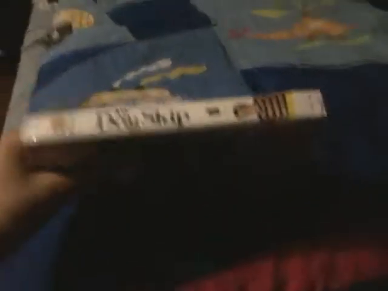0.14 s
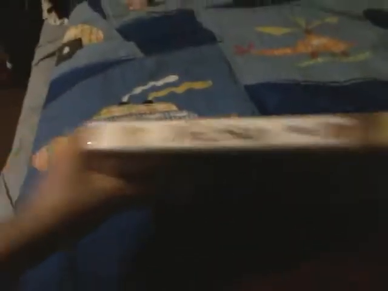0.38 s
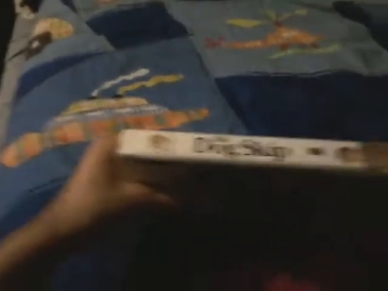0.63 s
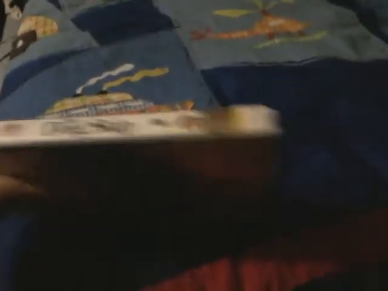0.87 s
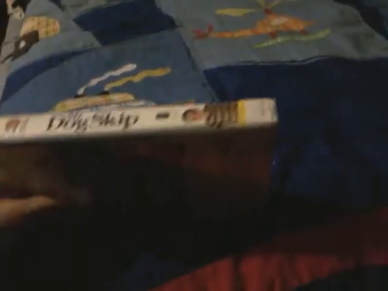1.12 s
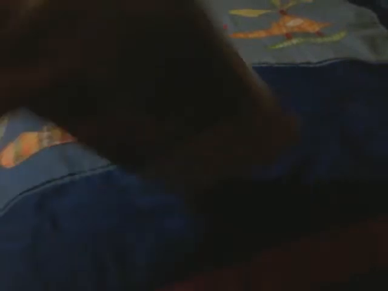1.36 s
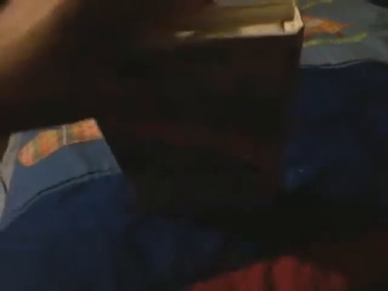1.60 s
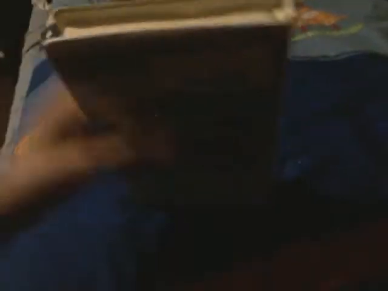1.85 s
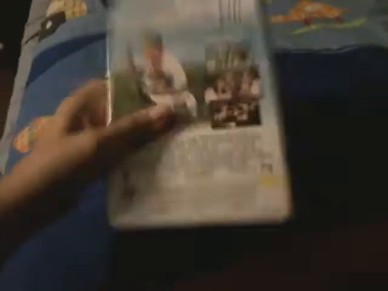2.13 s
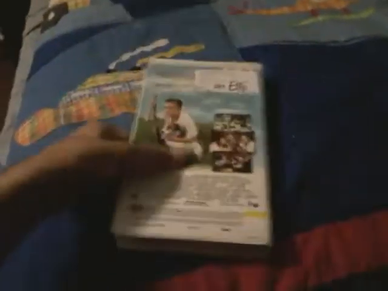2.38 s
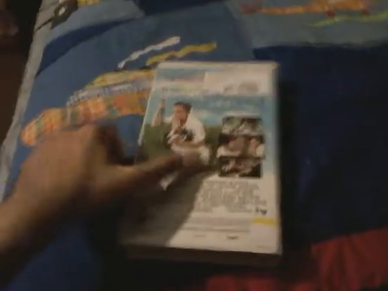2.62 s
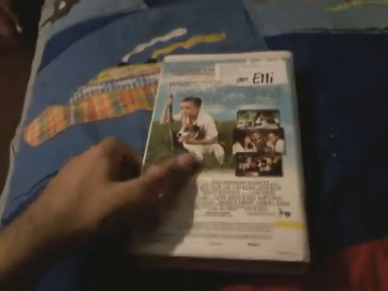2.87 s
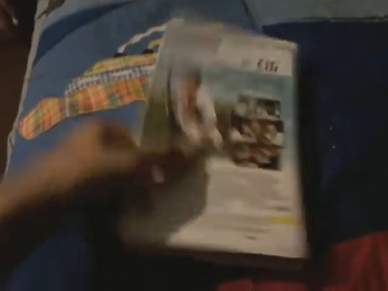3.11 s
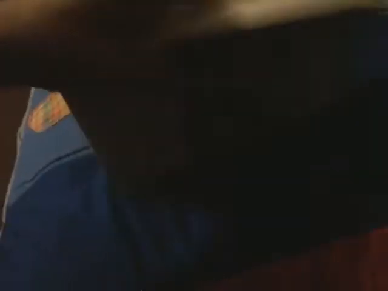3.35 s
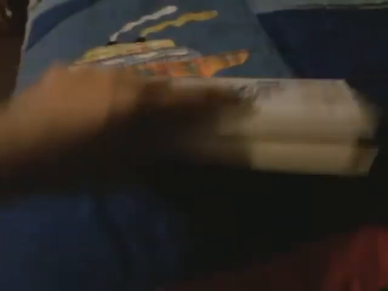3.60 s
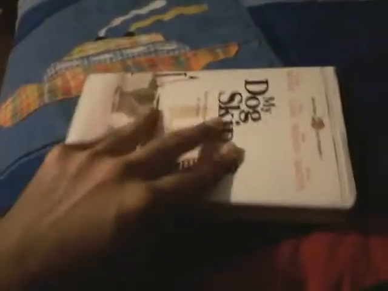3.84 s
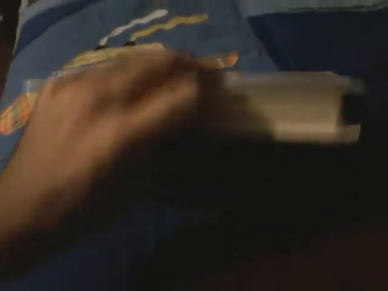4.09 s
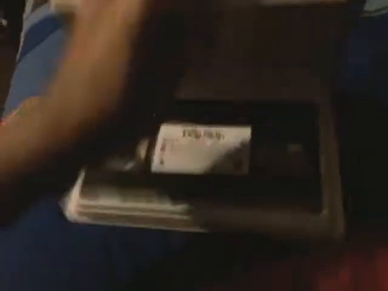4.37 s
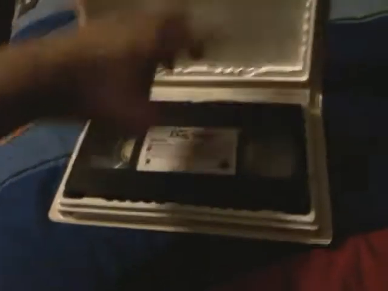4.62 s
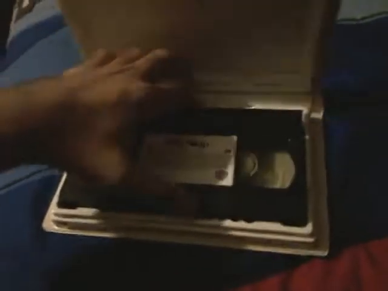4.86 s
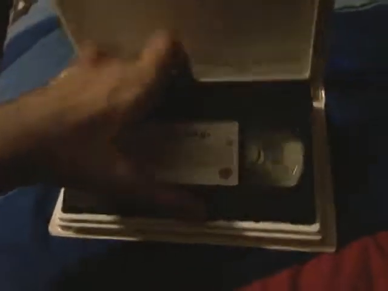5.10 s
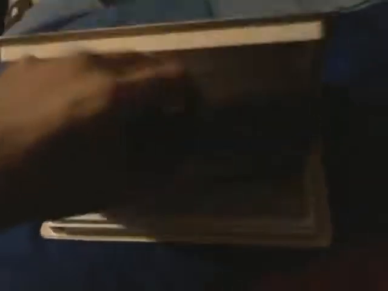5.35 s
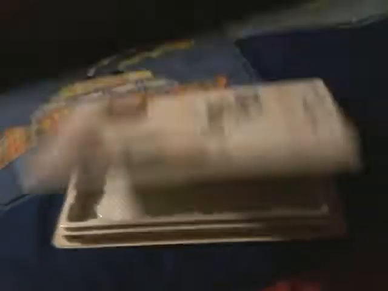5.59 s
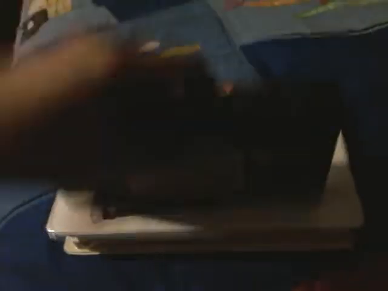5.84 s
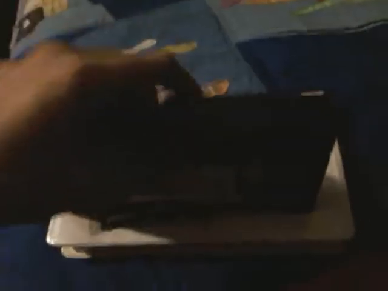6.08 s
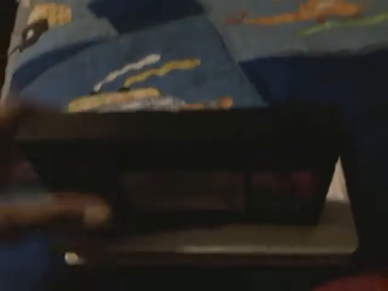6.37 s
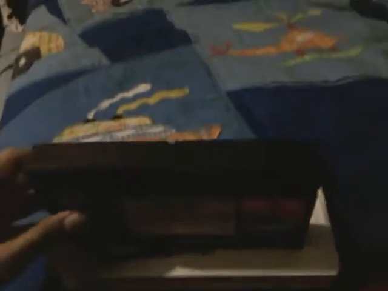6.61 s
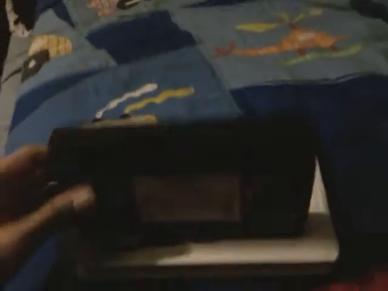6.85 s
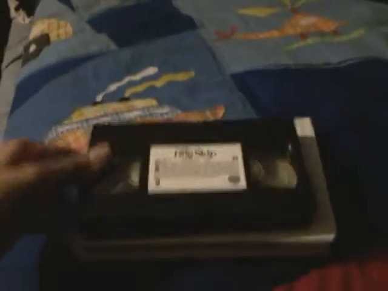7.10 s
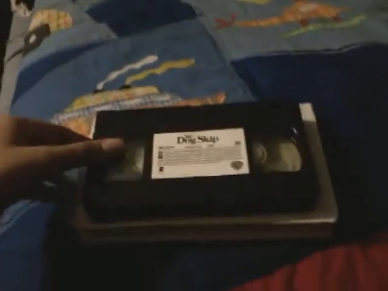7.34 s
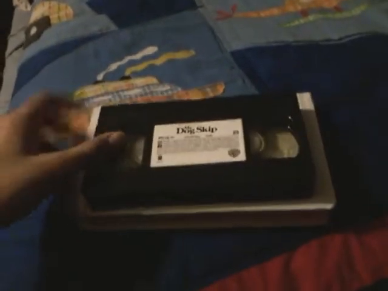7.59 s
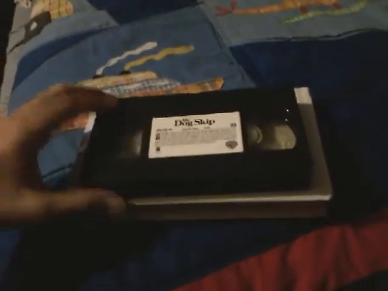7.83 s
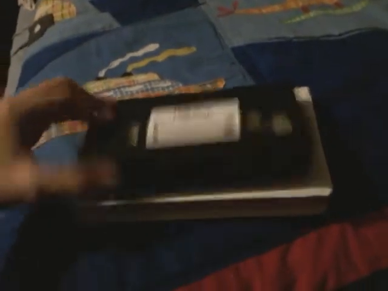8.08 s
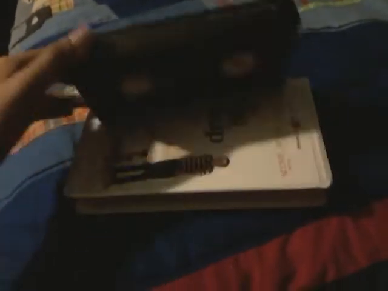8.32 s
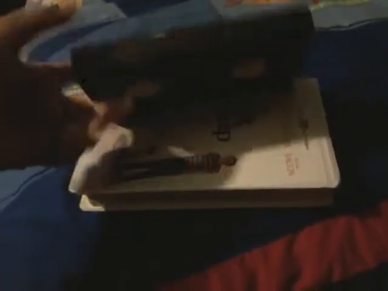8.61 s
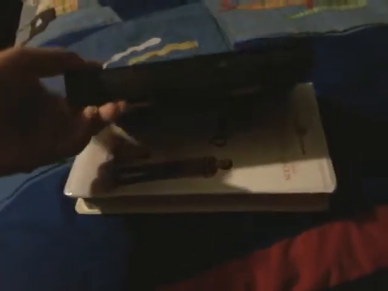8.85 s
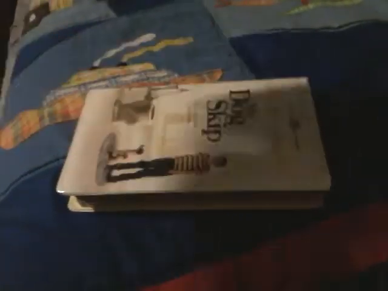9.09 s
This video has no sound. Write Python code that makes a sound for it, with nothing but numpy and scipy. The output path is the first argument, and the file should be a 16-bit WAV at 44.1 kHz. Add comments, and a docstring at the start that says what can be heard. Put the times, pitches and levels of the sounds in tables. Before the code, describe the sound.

Close plastic handling in a quiet soft room: light rubbing, a sharp catch pop, rattling clicks, loud hollow clacks, then sparse cassette taps.

```python
"""A faint mains hum and soft hiss come first, then quiet rubbing and light knocks join in.
A hollow plastic clamshell case and the cassette inside it are turned, opened, snapped shut and set down on a bed.
Each contact is a spiky noise rattle sent through a brittle edge, a ringing hollow shell and flat panels.
Fingers and cloth are grainy noise with squeaks and crackles; thumps through the bedding are short low swings.
A small soft room answers, and the microphone favours tones near 7 kHz."""
import sys
import numpy as np
from scipy import signal
from scipy.fft import rfft, irfft
from scipy.io import wavfile
from scipy.ndimage import uniform_filter1d, map_coordinates

SR = 44100
rng = np.random.default_rng(int(sys.argv[2]) if len(sys.argv) > 2 else 0)


def bounce(signal):
    """Save signal as a 16-bit WAV file at the path given by the first command-line argument."""
    frames = np.transpose(np.atleast_2d(signal))
    limited = np.clip(frames, -1, 1)
    pcm = np.round(limited * 32767).astype(np.int16)
    wavfile.write(sys.argv[1], SR, pcm)


def convert_level_to_amplitude(level_db):
    """Map a level in decibels to its linear amplitude factor."""
    exponent = np.asarray(level_db, float) / 20
    return 10 ** exponent


N = 406161  # length of the scene in samples
TAIL = 8192  # room for one event in samples


def unit(x):
    """Scales the whole signal to rms 1."""
    return x / np.sqrt(np.mean(x ** 2) + 1e-20)


def peaked(x):
    """Scales every row to peak 1."""
    return x / np.abs(x).max(-1, keepdims=True)


def along(points, hz):
    """Reads a curve of (Hz, value) points on a logarithmic pitch axis."""
    point_hz, value = np.transpose(points)
    return np.interp(np.log(hz + 1), np.log(point_hz + 1), value)


def curves(rows):
    """Draws one value per sample for each column after the time."""
    s, *columns = np.transpose(rows)
    return [np.interp(np.arange(N) / SR, s, column) for column in columns]


def wobble(rate):
    """A smooth random curve with the given number of random points a second."""
    points = rng.standard_normal(int(N * rate / SR) + 4)
    return map_coordinates(points, [np.arange(N) * rate / SR])


def coloured(x, points):
    """Filters x by (Hz, dB) points without sounding ahead of time (minimum phase)."""
    log_gain = np.log(convert_level_to_amplitude(along(points, np.fft.rfftfreq(4096, 1 / SR))))
    cepstrum = irfft(log_gain)
    # folding the second half onto the first puts the energy as early as possible
    cepstrum[1:2048] *= 2
    cepstrum[2049:] = 0
    kernel = irfft(np.exp(rfft(cepstrum)))
    return signal.oaconvolve(np.atleast_2d(x), kernel[None], axes=1)[:, :x.shape[-1]]


def resonance(rows, hz, width):
    """Each row excites its own resonance; width is a share of the pitch."""
    f = np.fft.rfftfreq(rows.shape[1], 1 / SR)
    damping = 1j * f * width * hz
    response = damping / (hz ** 2 - f ** 2 + damping)
    return irfft(rfft(rows) * response, rows.shape[1])


def placed(rows, s):
    """Adds the rows up on the time line, each from its own start in seconds."""
    at = np.round(s * SR).astype(int) + np.arange(TAIL)
    return np.bincount(at.ravel(), rows.ravel(), N + TAIL)[:N]


def grains(shape, depth_db):
    """Stick-slip noise: sudden uneven grains, with coloured patches that drift as the contact moves."""
    size = rng.standard_normal((shape[0], shape[1] // 256 + 1))
    size = np.repeat(size, 256, 1)[:, :shape[1]]
    spectrum = signal.stft(rng.standard_normal(shape), nperseg=256)[2]
    field = uniform_filter1d(rng.standard_normal(spectrum.shape), size=4, axis=1)
    field = uniform_filter1d(field, size=12, axis=2)
    patchy = signal.istft(spectrum * convert_level_to_amplitude(3 * unit(field)), nperseg=256)[1][:, :shape[1]]
    return patchy * convert_level_to_amplitude(depth_db * size)


# How fast the room falls silent. Each row: pitch in Hz, time to fall by 60 dB in seconds.
ROOM_DECAY = [(200, 0.25), (1000, 0.16), (8000, 0.14)]


def room(rows):
    """Reflections: a fresh diffuse noise tail for every row, each frequency dying at its own speed."""
    hz, t, spectrum = signal.stft(rng.standard_normal(rows.shape), SR, nperseg=256)
    fade = convert_level_to_amplitude(-60 * t / along(ROOM_DECAY, hz)[:, None])
    tail = signal.istft(spectrum * fade, SR, nperseg=256)[1]
    # the first walls are a metre or two away, so the tail grows over 14 ms
    tail *= np.clip(np.arange(tail.shape[1]) / SR / 0.014, 0, 1)
    tail /= np.linalg.norm(tail, axis=1, keepdims=True)
    return signal.fftconvolve(rows, tail, axes=1)[:, :rows.shape[1]]


# Colour of the air in the room. Each row: pitch in Hz, relative level in dB.
AIR_COLOUR = [(20, -9.5), (45, -10), (80, -1.5), (130, -6.5), (200, -8.5), (400, -18), (700, -25.5),
              (1500, -30), (3000, -35.5), (8000, -37.5), (16000, -36.5)]


def room_air():
    """Steady hiss and low rumble: random noise with the colour of the room's air."""
    return convert_level_to_amplitude(-60.0) * unit(coloured(rng.standard_normal(N), AIR_COLOUR))


# Mains hum. Each row: pitch in Hz, average rms level in dB before it wavers.
HUM_TONES = [(120, -60), (180, -76), (240, -82.5), (300, -81), (360, -71.5)]


def hum():
    """Mains harmonics: steady sine waves, each wavering a little in level and phase."""
    t = np.arange(N) / SR
    total = 0
    for hz, db in HUM_TONES:
        level = np.sqrt(2) * convert_level_to_amplitude(db + 0.91 * wobble(20))
        total = total + level * np.sin(2 * np.pi * hz * t + 0.58 * wobble(10))
    return total


# Thumps reaching the microphone through the bedding.
# Each row: start in seconds, peak level in dB, pitch in Hz.
BED_THUMPS = [(2.318, -35, 192), (3.429, -47, 75), (3.735, -44.5, 40), (3.87, -48.5, 75), (4.28, -51, 40),
              (4.412, -31, 82.2), (4.493, -29.5, 154), (5.17, -54, 60), (5.249, -44, 51), (5.332, -42, 110),
              (5.521, -45, 50), (5.888, -35, 128.5)]


def pushes():
    """The mattress heaves for a cycle or two: a heavily damped low swing."""
    s, db, hz = np.transpose(BED_THUMPS)[:, :, None]
    turns = hz * np.arange(TAIL) / SR
    swing = turns * np.exp(-2.2 * turns) * np.sin(2 * np.pi * turns)
    return placed(convert_level_to_amplitude(db) * peaked(swing), s)


# Fine hiss of skin on plastic. Each row: pitch in Hz, relative level in dB per Hz.
FINE_COLOUR = [(2000, -19), (3500, -9), (5000, -9), (7000, -7.5), (9000, -6), (16000, -11.5)]


def fine_hiss(shape, depth_db):
    """Small ridges of skin slip over plastic: bright grainy noise at rms 1."""
    return unit(coloured(grains(shape, depth_db), FINE_COLOUR))


# Coarse scrape of skin and cloth. Each row: pitch in Hz, relative level in dB per Hz.
COARSE_COLOUR = [(200, -22.5), (500, 1), (1000, 1), (2000, -3), (3000, -6.5), (5000, -20)]


def coarse_scrape(shape, depth_db):
    """Broad rubbing makes duller grainy noise, at rms 1."""
    return unit(coloured(grains(shape, depth_db), COARSE_COLOUR))


# Fingers shifting between strokes. Each row: time in seconds, scrape level in dB before the flurries.
FIDGETING = [(0, -72), (.5, -78.5), (1.1, -69.5), (2.1, -74), (2.5, -70), (3.1, -74.5), (4.1, -68.5),
             (4.55, -68), (4.9, -69.5), (5.1, -66.5), (5.62, -56), (5.85, -67.5), (6.2, -71), (6.6, -82),
             (7.2, -68), (7.9, -74), (8.6, -74), (9.21, -77.5)]


def rubbing():
    """Faint fidgeting of the fingers: hiss and scrape noise, coming in flurries."""
    coarse_db, = curves(FIDGETING)
    fine_db = coarse_db - 1.5
    flurry_db = 3.0 * wobble(25)
    hiss = convert_level_to_amplitude(fine_db + flurry_db) * fine_hiss((1, N), depth_db=1.1)
    scrape = convert_level_to_amplitude(coarse_db + flurry_db) * coarse_scrape((1, N), depth_db=0.0)
    return hiss + scrape


# Colour of the brittle plastic edge. Each row: pitch in Hz, relative level in dB per Hz.
EDGE_COLOUR = [(700, -37.5), (1500, -1), (2200, 1.5), (3200, -0.5), (5000, -3), (9000, -4.5), (16000, -12)]


def through_edge(x):
    """A thin brittle edge passes the middle and treble and little bass."""
    return coloured(x, EDGE_COLOUR)


# Sliding strokes of skin and cloth. Each row: start in seconds, length in seconds,
# scrape level in dB, hiss level in dB over the scrape, squeak pitch in Hz.
SLIDES = [(0.153, 0.071, -64.5, -2, 7000), (0.596, .16, -73.5, -18, 7000), (0.738, 0.25, -66.5, 1.5, 1500),
          (0.802, 0.17, -66.5, 6, 1490), (1.151, 0.05, -77.5, 13.5, 7000), (1.308, 0.078, -67.5, 0, 7040),
          (1.497, 0.086, -64, 1, 1020), (1.939, 0.092, -67.5, -4, 7200), (2.31, 0.048, -49.5, 9, 2160),
          (2.363, 0.087, -58, -11, 7360), (2.575, 0.043, -65, -6, 402), (2.875, 0.048, -61.5, -7, 7540),
          (3.15, 0.086, -72.5, 6, 7540), (3.229, 0.088, -58, 6.5, 2500), (3.325, .06, -58, 8.5, 3000),
          (3.359, 0.073, -58, 10, 3700), (3.547, 0.072, -83, 15, 7300), (3.721, 0.068, -53, -4, 6400),
          (4.263, 0.049, -44, -7.5, 2320), (4.383, 0.046, -51, -12.5, 2900), (5.147, .1, -48.5, -11, 2030),
          (5.233, .085, -50.5, 2.5, 2300), (5.318, 0.11, -55, -7, 2380), (5.741, .05, -61, -7, 1700),
          (5.796, 0.034, -61.5, -4.5, 930), (6.888, 0.058, -64.5, 5.5, 4760), (7.036, 0.13, -56, 0.5, 7260),
          (7.265, .08, -66, -3, 7400), (7.332, 0.017, -55, -12, 1920), (7.487, 0.037, -49.5, -3, 2020),
          (8.131, 0.1, -63, 2, 5970), (8.277, 0.097, -68.5, 7, 6240), (8.382, 0.12, -79, -9, 4200),
          (8.689, 0.022, -48.5, -11, 3500)]


def strokes():
    """Sliding friction: grainy noise starts and stops quickly, with a faint squeak and crackles."""
    squeak_db, crackle_db = -7.5, 21  # against the scrape
    crackles_per_s = 170
    grip_share, let_go_s = .3, 0.054  # part of a stroke spent taking hold; time to let go
    start, length, coarse_db, hiss_db, hz = np.transpose(SLIDES)[:, :, None]
    fine_db = coarse_db + hiss_db
    t, shape = np.arange(TAIL) / SR, (len(start), TAIL)
    take_hold = np.clip(t / (grip_share * length), 0, 1)
    let_go = np.clip((length - t) / let_go_s + .5, 0, 1)
    grip = np.sin(np.pi / 2 * take_hold * let_go) ** 2

    slide = convert_level_to_amplitude(fine_db) * fine_hiss(shape, depth_db=0.1)
    slide = slide + convert_level_to_amplitude(coarse_db) * coarse_scrape(shape, depth_db=5.0)
    squeak = resonance(grains(shape, depth_db=3.6), hz, width=0.099)
    squeak = convert_level_to_amplitude(coarse_db + squeak_db) * squeak / squeak.std(1, keepdims=True)

    # a smooth random flutter with 45 points a second in every stroke
    spots = np.broadcast_arrays(np.arange(len(start))[:, None], t * 45)
    flutter = convert_level_to_amplitude(1.8 * map_coordinates(rng.standard_normal((len(start), 32)), spots))

    # the plastic crackles as it flexes
    ticks = (rng.random(shape) < crackles_per_s / SR) * rng.standard_normal(shape)
    ticks = signal.lfilter([1], [1, 0, .6], ticks)
    crackle = convert_level_to_amplitude(coarse_db + crackle_db) * through_edge(ticks)
    dry = grip * (flutter * (slide + squeak) + crackle)
    return placed(dry + convert_level_to_amplitude(-7) * room(dry), start)


# Knocks, where a face of case or cassette lands. Each row: start in seconds, snap peak in dB,
# body level in dB against the snap, body pitch in Hz, rattle time to fall by 60 dB in seconds.
LANDINGS = [(.1773, -47.5, 7, 151, 0.037), (0.266, -50, 6.5, 377, 0.024), (1.542, -38.5, -6, 358, 0.0091),
            (2.1981, -49.5, -4, 151, 0.038), (2.3116, -30, 1, 301, 0.037), (2.3217, -21, 7.5, 384, 0.044),
            (2.8175, -47.5, -5, 196, 0.025), (3.2944, -37, 0, 336, 0.021), (3.3257, -37.5, 3.5, 336, 0.066),
            (3.999, -37.5, 0.5, 640, 0.03), (4.2681, -35, -7, 194, .051), (4.289, -21.5, -7, 487, 0.018),
            (4.7282, -11.5, -19, 680, 0.0063), (4.775, -27.5, -24, 154, 0.012),
            (4.8112, -23.5, -11, 660, 0.037), (4.842, -26, -19, 323, 0.013),
            (4.8624, -33.5, -8.5, 482, .014), (5.0353, -39, 4, 750, 0.036), (5.0938, -49, 0, 600, 0.027),
            (5.1511, -26.5, -12.5, 361, 0.041), (5.1866, -32.5, -8.5, 301, .014),
            (5.204, -41, -10, 600, 0.013), (5.218, -34, -6, 300, .02), (5.2301, -28, -4.5, 150, 0.032),
            (5.2465, -27, -12, 151, 0.021), (5.2726, -27, 1.5, 573, 0.023), (5.291, -38, 1, 400, 0.022),
            (5.3283, -29.5, 0.5, 553, 0.025), (5.3523, -30, 0, 537, 0.039), (5.445, -16, -20, 620, 0.026),
            (5.4674, -20.5, -6, 631, 0.027), (5.4768, -26, -8, 373, .026), (5.518, -7.5, -4.5, 620, 0.04),
            (5.7416, -37.5, -19.5, 151, 0.042), (5.8845, -9, -6.5, 549, 0.027),
            (5.8895, -12, 9.5, 600, .015), (5.9042, -6.5, -0.5, 309, 0.033), (7.1078, -15.5, -12, 310, .03),
            (7.114, -21, -14, 600, .05), (7.3335, -34.5, -16, 210, .022), (7.7701, -49.5, -3, 332, .031),
            (8.241, -37, -4, 660, 0.034), (8.977, -50, 2, 620, 0.03)]


def knocks():
    """A landing face sounds dull; higher knocks move from the shell to the flat panels."""
    panel_db = -13  # panels against the snap when only the shell is struck
    s, db, body_db, knock_hz, t60 = np.transpose(LANDINGS)
    flat = np.clip(np.log2(knock_hz / 480) / 0.72, 0, 1)  # 0 below 480 Hz, 1 from 0.72 octaves above
    shell_db = body_db - 14 * flat
    panel_db = panel_db + flat * (body_db - panel_db)
    colour_hz = 1852 * np.exp(.07 * rng.standard_normal(len(s)))
    return [s, db, shell_db, panel_db, colour_hz, knock_hz, t60]


# Snaps, where a thin edge or catch lets go. Each row: start in seconds, snap peak in dB,
# shell level in dB against the snap, snap colour in Hz, rattle time to fall by 60 dB in seconds.
RELEASES = [(1.4526, -50, -10, 3030, 0.047), (1.9809, -50.5, 0, 7290, 0.059), (2.7315, -39, -7, 7460, 0.04),
            (2.888, -47, -13, 5670, 0.019), (2.9073, -39.5, -1, 7640, 0.024), (3.7271, -43, -10, 6380, .02),
            (3.7407, -40, 2, 5340, 0.096), (3.7656, -28, -7.5, 6960, 0.017),
            (4.145, -25, -8.5, 1520, 0.015), (4.356, -44, -14, 5000, .01), (4.365, -39, -20, 4600, .01),
            (4.393, -41, 0, 6000, 0.052), (4.4155, -10, -11, 2940, 0.028),
            (4.4181, -13.5, -10.5, 1400, 0.026), (4.4223, -7, -12.5, 6460, 0.032),
            (4.5165, -24, -12, 2500, .014), (4.7559, -22.5, -23, 5940, .009),
            (5.3861, -23.5, -15, 4000, 0.0077), (5.5357, -6.5, -14, 3700, .018),
            (5.543, -15, -11.5, 3700, 0.045), (5.551, -21.5, -4.5, 3800, 0.037),
            (5.5689, -7.5, -12, 5440, 0.013), (5.694, -13, -12, 8600, 0.013),
            (5.801, -40.5, -7, 6890, 0.049), (6.2052, -52.5, -5, 5200, 0.033),
            (6.9064, -40.5, -28, 4690, .036), (7.05, -46, -20, 6500, .012),
            (7.0882, -33.5, -19, 5680, 0.022), (7.0984, -15, -5, 6200, 0.025),
            (7.2537, -48.5, -17, 3240, .026), (7.4917, -22.5, -5, 7550, 0.035),
            (7.5875, -52, -20, 7300, 0.014), (7.6522, -48, -5, 6570, 0.047), (7.6734, -41, -8, 6190, 0.055),
            (8.252, -17.5, -13.5, 1640, 0.018), (8.273, -24, -9, 1670, .027),
            (8.6848, -35.5, -8, 4200, 0.033), (8.8384, -45.5, -12, 7150, .024)]


def snaps():
    """A released edge shakes the upper shell modes and the panels."""
    s, db, shell_db, colour_hz, t60 = np.transpose(RELEASES)
    panel_db = np.full(len(s), -12.0)  # against the snap
    knock_hz = np.full(len(s), 445.0)
    return [s, db, shell_db, panel_db, colour_hz, knock_hz, t60]


def ringing(modes, t, centre_hz, spread_db, octave_db):
    """One ring per blow: modes near the blow's own pitch speak most, slightly detuned by the grip."""
    hz, db, t60 = np.transpose(modes)[:, None, :, None]
    strength, grip = rng.standard_normal((2, len(centre_hz), len(modes), 1))
    octaves_away = np.abs(np.log2(hz / centre_hz[:, None]))
    db = db + spread_db * strength - octave_db * octaves_away
    tone = np.sin(2 * np.pi * hz * (1 + 0.052 * grip) * t)
    return (convert_level_to_amplitude(db - 60 * t / t60) * tone).sum(1)


# Ringing tones of the hollow shell. Each row: pitch in Hz before detuning,
# relative level in dB before each blow weights it, time to fall by 60 dB in seconds.
SHELL_MODES = [(127, -14, .06), (211.6, -6.5, 0.085), (312, -8, 0.017), (362.6, 5.5, 0.049),
               (472.6, -0.5, 0.057), (600, -7, 0.14)]
# Ringing tones of the flat panels. Each row: pitch in Hz before detuning,
# relative level in dB before each blow weights it, time to fall by 60 dB in seconds.
PANEL_MODES = [(725, 10.5, 0.015), (875, 3.5, 0.038), (1070, 4.5, 0.032), (1319, -8, 0.013)]


def contacts():
    """Impacts: a spiky rattle sounds through the edge, and the same rattle knocks shell and panels."""
    push_share, push_s = 0.89, 0.00017  # the blow's weight against its rattle; contact time in seconds
    s, db, shell_db, panel_db, hz, knock_hz, t60 = np.hstack([knocks(), snaps()])[:, :, None]
    t, t60 = np.arange(TAIL) / SR, np.clip(t60, .003, .2)

    noise = rng.standard_normal((len(s), TAIL))
    spiky = noise * np.abs(noise) ** 0.69
    build = 1 - np.exp(-t / (t60 ** 2 * 0.25))  # long rattles build slowly
    rattle = spiky * convert_level_to_amplitude(-60 * t / t60) * build
    energy = np.linalg.norm(rattle, axis=1, keepdims=True)

    shell = ringing(SHELL_MODES, t, knock_hz, spread_db=4.0, octave_db=13.5)
    panel = ringing(PANEL_MODES, t, knock_hz, spread_db=6.5, octave_db=2.2)
    click = np.atleast_2d(1. * (t == 0))
    edge = through_edge(click) * np.ones_like(hz)
    # the struck spot favours one pitch; hard blows are broader
    edge = convert_level_to_amplitude(0.1 * (db + 19.5)) * edge + 0.99 * resonance(edge, hz, width=0.33)

    # the weight of the blow bends the shell one way
    bend = peaked(t * np.exp(-t / push_s)) / np.sqrt(push_s * SR)
    push = rattle + push_share * energy * bend

    # each row: what drives the part, the part, its peak in dB, its share of the room in dB
    parts = [(rattle, edge, db, -11),
             (push, shell, db + shell_db, -15),
             (rattle, panel, db + panel_db, -12)]
    dry, far = 0, 0
    for drive, part, level_db, room_db in parts:
        struck = signal.fftconvolve(drive, part, axes=1)[:, :TAIL]
        gain = convert_level_to_amplitude(level_db) / np.abs(struck).max(1, keepdims=True)
        dry = dry + gain * struck
        # the walls hear all sides of the case at once: a more even spectrum
        far = far + convert_level_to_amplitude(room_db) * gain * (energy * part + .5 * struck)
    return placed(dry + room(far), s)


# Colour of the microphone. Each row: pitch in Hz, gain in dB.
MICROPHONE = [(20, -16), (60, -7.5), (120, -1.5), (4000, -1), (7300, 2), (8500, -2.5), (10000, -10),
              (13000, -15), (16000, -21)]


def handling():
    """All contacts and rubbing as the microphone colours them, strongest near 7 kHz."""
    return coloured(contacts() + strokes() + rubbing(), MICROPHONE)


def scene():
    """Room air, hum and bed thumps under the handling of the case."""
    return room_air() + hum() + pushes() + handling()


def band_limit(x):
    """A steep low-pass at the top of the band."""
    return signal.sosfilt(signal.butter(12, 16490, fs=SR, output="sos"), x)


def record(dry):
    """The input stage rounds off the loudest snaps, bending smoothly towards a ceiling of 0.45."""
    soft = dry / (1 + np.abs(dry / .45) ** 3) ** (1 / 3)
    return band_limit(soft)


dry = scene()
out = record(dry)
bounce(out)
```